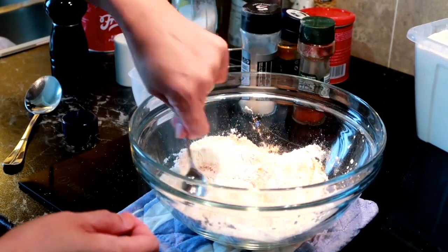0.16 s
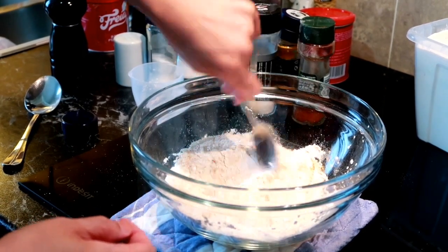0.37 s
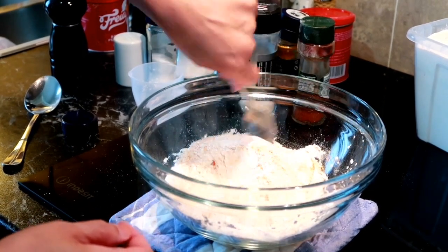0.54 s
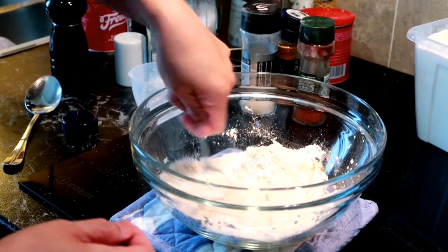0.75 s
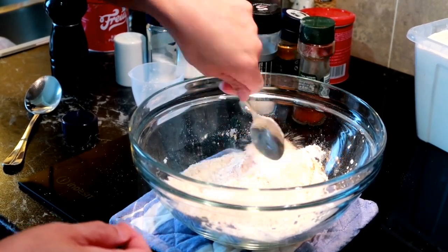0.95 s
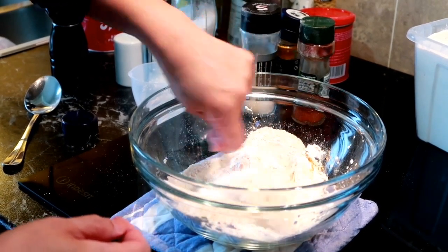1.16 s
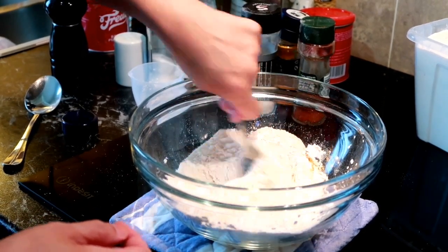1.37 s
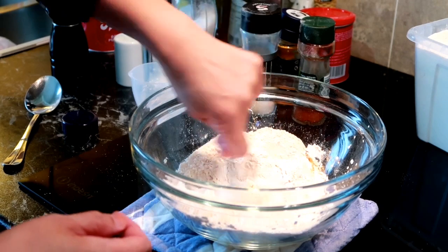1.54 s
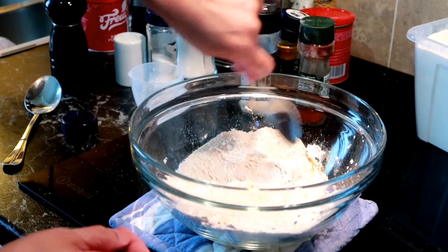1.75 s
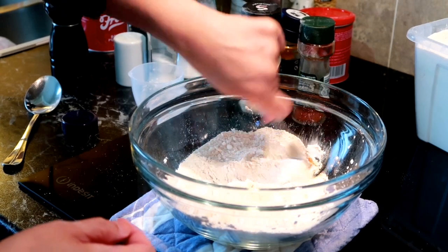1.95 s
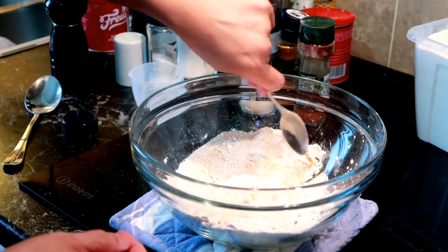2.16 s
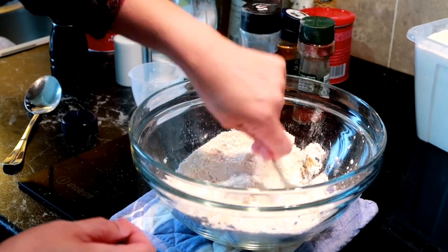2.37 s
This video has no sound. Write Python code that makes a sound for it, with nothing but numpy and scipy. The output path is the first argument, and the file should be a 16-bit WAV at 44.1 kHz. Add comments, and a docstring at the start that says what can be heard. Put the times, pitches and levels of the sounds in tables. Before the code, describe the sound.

Spoon stirring dry flour in a thick glass bowl: bright ringing clinks, dull knocks and short scrapes.

```python
"""Spoon stirring flour in a glass bowl

A steel spoon stirs dry flour in a thick glass bowl on a cloth, heard close up in a small tiled kitchen.
Blows on the wall sum bowl and spoon partials with bursts of noise; the bowl's ring dies at a changing speed.
Under the flour the spoon knocks in short tones and scrapes as random grit driving damped resonances.
The bowl sways and knocks on its cloth; the kitchen answers with decaying noise tails over a soft, steady hum."""
import sys
import numpy as np
from scipy import signal
from scipy.fft import rfft, irfft, next_fast_len
from scipy.io import wavfile
from scipy.ndimage import uniform_filter1d, map_coordinates

SR = 44100
rng = np.random.default_rng(int(sys.argv[2]) if len(sys.argv) > 2 else 0)


def natural_amplitude(level_db):
    """Convert a level in decibels to a linear amplitude factor, elementwise."""
    exponent = np.asarray(level_db, float) / 20
    return 10 ** exponent


def persist_wave(psi):
    """Save psi, clipped to +-1, as 16-bit WAV."""
    counts = np.round(np.clip(psi, -1, 1) * 32767).astype(np.int16)
    wavfile.write(sys.argv[1], SR, np.atleast_2d(counts).T)


N = 110250  # samples, 2.5 s

# blows of the spoon on the glass: start_s, bowl_ring_db, brightness_db_per_octave, four_wave_mode_db,
# rim_place_rad, spoon_ring_db, crack_db
BLOWS = [(0.2142, -33.5, 2, 4, .06, -30.5, -8.5), (0.2173, -11.5, 2.5, -7, 0.042, -30, -10.5),
         (0.3502, -49.5, -10.5, -6, 0.16, -49, -16), (.6105, -24.5, -4, 5.5, .07, -51.5, -11.5),
         (1.9516, -24, 4.2, 0.7, 0.066, -20.5, -13.5), (2.0694, -57, 7, -5, .2, -56, -18),
         (2.1111, -41, .3, -12, .2, -47.5, -27.5), (2.2817, -44.5, 11, 4, 0.028, -44, -15.5)]
# resonances of the spoon's edge, damped against the glass: pitch_hz, width_hz (before squaring), level_db
EDGE_RESONANCES = [(1878, 137, 0), (2670, 500, -0.5), (2940, 330, 1.5), (3390, 480, -7), (5590, 810, -15),
                   (6150, 470, -13.5), (7040, 320, -14), (8250, 1600, -27.5)]
SWELL_S = 0.0035  # time constant of the ring spreading round the bowl


def unit(x):
    """Scale to rms 1."""
    return x / np.sqrt(np.mean(x ** 2) + 1e-20)


def along(points, hz):
    """Read (Hz, value) points on a logarithmic frequency axis."""
    point_hz, value = np.transpose(points)
    return np.interp(np.log(hz + 1), np.log(point_hz + 1), value)


def curve(rows, outside):
    """Draw (s, value) points as one value per sample, with a resting value beyond the ends."""
    point_s, value = np.transpose(rows)
    return np.interp(np.arange(N) / SR, point_s, value, outside, outside)


def filtered(x, response):
    """Multiply the spectrum of x by a response, real or complex, given as a function of frequency."""
    size = next_fast_len(x.shape[-1] + 8192)
    spectrum = rfft(x, size) * response(np.fft.rfftfreq(size, 1 / SR))
    return irfft(spectrum, size)[..., :x.shape[-1]]


def spread(pair):
    """Turn two signals into the mid and side of a stereo pair, the side shaped by frequency."""
    # side against mid at the microphones: pitch_hz, level_db
    side_width = [(300, -15.5), (1500, -27), (2500, -18.5), (3500, -11.5), (8000, 5.8)]
    side = filtered(pair[1], lambda hz: natural_amplitude(along(side_width, hz)))
    return np.array([pair[0] + side, pair[0] - side])


def mode(hz, db, t60, t, worn):
    """One decaying stereo partial; worn is the time as the damping counts it."""
    # higher partials reach the two microphones further out of phase
    spread_rad = min((hz / 3900) ** 4, 2)
    phase = rng.standard_normal() * spread_rad * np.array([[0.5], [-0.5]])
    return natural_amplitude(db - 60 * worn / t60) * np.sin(2 * np.pi * hz * t + phase)


def rings():
    """Bowl ring: where a blow lands on the rim shares its push between the two partials of each row."""
    # bowl modes, most in close pairs that beat; the last row joins two separate high partials:
    # waves_round_rim, first_pitch_hz, second_pitch_hz, level_db, first_t60_s, second_t60_s (at decay speed 1)
    bowl_modes = [(3, 1232, 1234.5, 0, 0.69, 1.52), (4, 2259, 2244, -7, 0.6, 0.54),
                  (5, 3478, 3451, -4, .24, .45), (6, 4883, 6800, -30.5, 0.46, 0.59)]
    # how fast the ring dies: time_s, decay_speed (1 = the listed t60; below 1 rings longer)
    decay_speed = [(0, 1.1), (.22, 1.16), (.35, 0.74), (.45, 1.03), (.6, 1.9), (.63, 0.51), (.7, 0.59),
                   (.77, 1.67), (.84, 1.16), (1.0, 1.3), (1.94, 2.6), (1.97, 0.53), (2.03, 0.73),
                   (2.1, 1.6), (2.26, 1.34), (2.3, 1.99), (2.4, 0.27), (2.5, .8)]
    lowest_hz, four_waves = bowl_modes[0][1], bowl_modes[1][0]
    out = np.zeros((2, N))
    wear = np.cumsum(np.clip(curve(decay_speed, 1), 0.05, 9)) / SR
    for start_s, ring_db, tilt_db, four_db, place, *_ in BLOWS:
        i = round(start_s * SR)
        t = np.arange(min(N - i, SR)) / SR
        worn = wear[i:i + SR] - wear[i]
        swell = 1 - np.exp(-t / SWELL_S)
        for waves, first_hz, second_hz, db, first_t60, second_t60 in bowl_modes:
            level = ring_db + db + four_db * (waves == four_waves) + tilt_db * np.log2(first_hz / lowest_hz)
            first = np.cos(waves * place) * mode(first_hz, level, first_t60, t, worn)
            second = np.sin(waves * place) * mode(second_hz, level, second_t60, t, worn)
            out[:, i:i + SR] += (first + second) * swell
    return out


def spoon():
    """Gripped spoon: short partials that flutter in level, with a splash of bright noise at the start."""
    # spoon partials: pitch_hz, level_db, t60_s
    spoon_modes = [(5249, -10, .14), (5843, -14, .15), (5922, -6, .08), (6029, -6, .1), (6207, -14, .25),
                   (6417, -12, .2), (7162, -9, .26), (7512, -10, .2), (7900, -10, .2), (8130, -8, .15),
                   (8565, -3, .12), (9222, -15, .14), (9570, -9, .22), (9950, -14, .12), (12420, -19, .2)]
    # colour of the splash: pitch_hz, relative level_db_per_hz
    splash_colour = [(1500, -56), (3000, 11), (5500, -0.5), (8300, 3.5), (10200, -22), (11000, -28),
                     (13000, -15), (16000, -33)]
    rattle_per_s, splash_db, splash_t60_s = 76.6, 4, 0.042
    out, t = np.zeros((2, N + SR)), np.arange(SR // 2) / SR
    splash_fade = natural_amplitude(splash_db - 60 * t / splash_t60_s)
    for start_s, *_, spoon_db, _ in BLOWS:
        ring = np.zeros((2, len(t)))
        for hz, db, t60 in spoon_modes:
            # smooth random gain, also turning the partial's sign
            flutter = map_coordinates(rng.standard_normal(SR // 2), [t * rattle_per_s])
            ring += flutter * mode(hz, db, t60, t, t)
        noise = rng.standard_normal((2, len(t)))
        splash = spread(unit(filtered(noise, lambda hz: natural_amplitude(along(splash_colour, hz)))))
        out[:, round(start_s * SR):][:, :len(t)] += natural_amplitude(spoon_db) * (ring + splash_fade * splash)
    return out[:, :N]


def cracks():
    """Steel meeting glass: a few milliseconds of coloured noise at each blow."""
    # colour of the contact: pitch_hz, relative level_db_per_hz
    crack_colour = [(60, -40), (200, -11.5), (650, -4.5), (1100, -10), (1800, -1), (3300, -1),
                    (4400, -11.5), (5000, -16), (6000, -13.5), (8000, -34), (11000, -74), (16000, -70)]
    t60_s, attack_s = 0.016, 0.00068
    out, t = np.zeros((2, N)), np.arange(SR // 20) / SR
    for start_s, *_, db in BLOWS:
        burst = natural_amplitude(db - 60 * t / t60_s) * (1 - np.exp(-t / attack_s))
        out[:, round(start_s * SR):][:, :len(t)] += burst * rng.standard_normal((2, len(t)))

    def even_colour(hz):
        """Scale the colour to rms 1 over frequency, so that it keeps the level of the bursts."""
        gain = natural_amplitude(along(crack_colour, hz))
        return gain / np.sqrt(np.mean(gain ** 2))

    return spread(filtered(out, even_colour))


def resonance(f, hz, width, db):
    """A steep resonance with dark skirts: a bandpass response squared."""
    return natural_amplitude(db) * (1j * f * width / (hz * hz - f * f + 1j * f * width)) ** 2


def edge(f):
    """The spoon's edge pressed on the glass: all its resonances, with alternating sign."""
    return sum((-1) ** k * resonance(f, *row) for k, row in enumerate(EDGE_RESONANCES))


def scrape():
    """Grit slips under the spoon's edge and excites its damped resonances; powder hisses along."""
    # scraping pressure, one list per stretch of scraping: time_s, level_db (before the trim)
    strokes = [
        [(0.64, -53), (0.68, -61.5), (0.712, -48.5), (0.738, -48.5), (0.748, -66), (0.82, -77)],
        [(1.12, -72), (1.176, -53.5), (1.206, -51.5), (1.246, -39.5), (1.264, -63), (1.356, -64), (1.364, -47),
         (1.38, -65), (1.434, -52), (1.468, -57.5), (1.48, -47), (1.546, -61.5), (1.566, -47.5), (1.618, -39),
         (1.626, -59.5), (1.74, -72)],
        [(2.08, -45.5), (2.102, -48), (2.114, -39.5), (2.144, -53.5), (2.22, -63)],
        [(2.32, -68), (2.364, -56), (2.384, -54.5), (2.394, -49.5), (2.416, -53.5), (2.436, -66), (2.442, -55),
         (2.5, -63.5)],
    ]
    # colour of the shifting powder: pitch_hz, relative level_db_per_hz
    powder_colour = [(300, -120), (700, -9), (1500, -0.5), (3500, 6.5), (7000, -18), (11000, -44),
                     (15000, -65)]
    grit_per_s, grit_spread_db = 1800, 6
    patchy_db, patches_per_s = 1.5, 30  # each resonance comes and goes as the spoon tilts
    powder_db, trim_db = -10.5, 0.5
    pressure = sum(natural_amplitude(curve(rows, -120)) for rows in strokes)
    pressure = uniform_filter1d(pressure, size=200)
    edge_rms = np.sqrt(np.mean(abs(edge(np.fft.rfftfreq(SR, 1 / SR))) ** 2))
    rub = np.zeros((2, N))
    for row in EDGE_RESONANCES:
        slips = rng.random((2, N)) < grit_per_s / SR
        size_db = grit_spread_db * np.minimum(rng.exponential(size=(2, N)), 3)
        grit = unit(slips * rng.standard_normal((2, N)) * natural_amplitude(size_db))
        patch = map_coordinates(rng.standard_normal(N), [np.arange(N) * patches_per_s / SR])
        push = grit * pressure * natural_amplitude(patchy_db * patch)
        rub += filtered(push, lambda f: resonance(f, *row)) / edge_rms
    noise = rng.standard_normal((2, N))
    powder = unit(filtered(noise, lambda hz: natural_amplitude(along(powder_colour, hz))))
    return natural_amplitude(trim_db) * spread(rub + natural_amplitude(powder_db) * pressure * powder)


def ticks():
    """Dull knocks and grit snaps under the flour: short damped tones, which also jolt the spoon's edge."""
    # knocks and snaps: start_s, level_db (before the trims below), pitch_hz
    knocks = [(1.1028, -27.5, 1400), (1.1497, -24.5, 1574), (1.222, -30.5, 1910), (1.2405, -26, 2000),
              (1.3283, -34.5, 3160), (1.3631, -30.5, 2420), (1.4315, -35, 2900), (1.479, -37, 2980),
              (1.5743, -48, 2640), (1.6086, -32.5, 3130)]
    fade_cycles = 13.4  # cycles of the main tone to fall 60 dB
    tone_db, jolt_db, attack_s = 2.5, 10, 0.00044
    out, jolt, t = np.zeros(N), np.zeros(N), np.arange(SR // 20) / SR
    for start_s, db, hz in knocks:
        i = round(start_s * SR)
        fade = natural_amplitude(db + tone_db - 60 * t * hz / fade_cycles) * (1 - np.exp(-t / attack_s))
        tones = np.sin(2 * np.pi * hz * t)
        tones += 0.38 * np.sin(2 * np.pi * hz * 1.42 * t)
        tones += 0.39 * np.sin(2 * np.pi * hz * 0.5 * t)
        out[i:][:len(t)] += fade * tones
        jolt[i] = natural_amplitude(db + jolt_db)
    return np.tile(out + filtered(jolt, edge), (2, 1))  # the same in both channels


def sway():
    """The whole bowl sways oval in its slowest mode, and its foot knocks dully on the cloth."""
    # pushes, by how squarely the bowl is hit: start_s, sway_db, knock_db
    pushes = [(.2139, -33, -31.5), (.3501, -39, -37), (.6105, -36.5, -43), (1.9515, -35.5, -36.5),
              (2.0692, -72, -41.5), (2.2817, -39, -36)]
    # oval mode, a close pair: pitch_hz, level_db, t60_s
    oval_modes = [(485, 1, 0.39), (475, -17, 0.43)]
    # knock on the cloth: pitch_hz, level_db, t60_s
    cloth_modes = [(342, -9.5, 0.088), (659.6, -3.5, .16), (726, -5.5, 0.14), (856, 7, 0.027)]
    out, t = np.zeros((2, N + SR)), np.arange(SR) / SR
    swell = 1 - np.exp(-t / SWELL_S)
    for start_s, sway_db, knock_db in pushes:
        oval = sum(mode(hz, sway_db + db, t60, t, t) for hz, db, t60 in oval_modes)
        knock = sum(mode(hz, knock_db + db, t60, t, t) for hz, db, t60 in cloth_modes)
        out[:, round(start_s * SR):][:, :SR] += oval * swell + knock
    return out[:, :N]


def kitchen(x):
    """The walls' answer: noise tails in which each frequency dies at its own speed."""
    # reverberation: pitch_hz, t60_s
    tail_times = [(200, 0.34), (1500, 0.44), (4000, 0.27), (10000, 0.26)]
    wall_delay_s = 0.003
    out, step = np.zeros((2, N + 2 * SR)), SR // 2
    for i in range(0, N, step):  # a fresh tail for each half second
        hz, t, z = signal.stft(rng.standard_normal((2, step)), SR, nperseg=256)
        fade = natural_amplitude(-60 * t / along(tail_times, hz)[:, None])
        tail = signal.istft(z * fade, SR, nperseg=256)[1][:, :step]
        wet = signal.fftconvolve(x[None, i:i + step], tail / np.linalg.norm(tail[0]), axes=1)
        out[:, i + round(wall_delay_s * SR):][:, :wet.shape[1]] += wet
    return spread(out[:, :N])


def hum():
    """The kitchen's steady rumble and hiss: coloured noise, less alike left and right as pitch rises."""
    # colour of the hum: pitch_hz, relative level_db_per_hz
    hum_colour = [(12, -19), (30, -8), (85, -4.5), (125, -10), (165, -6), (195, -4.5), (250, -12),
                  (330, -6.5), (500, -11.5), (1000, -17), (2500, -22), (6000, -30.5), (12500, -37.5),
                  (16000, -66)]
    # left-right likeness: pitch_hz, correlation (1 = same, 0 = unrelated)
    likeness = [(60, 1), (130, 0.95), (300, 0.43), (950, 0.089), (3770, 0.016), (15000, -0.39)]
    hum_db = -52  # rms

    def mid_side_gains(hz):
        """Split the power between mid and side to give the wanted correlation."""
        angle = np.arccos(np.clip(along(likeness, hz), -1, 1)) / 2
        return natural_amplitude(along(hum_colour, hz)) * [np.cos(angle), np.sin(angle)]

    mid, side = filtered(rng.standard_normal((2, N)), mid_side_gains)
    return natural_amplitude(hum_db) * unit(np.array([mid + side, mid - side]))


def scene():
    """Bowl, spoon and flour, their echo and the hum."""
    ring = rings() + sway()
    crack = cracks() + spoon()
    rub = scrape() + ticks()
    # the left channel of each group feeds the room
    room_feed = natural_amplitude(-14.5) * ring[0] + natural_amplitude(-8.5) * crack[0] + natural_amplitude(-7) * rub[0]
    return ring + crack + rub + kitchen(room_feed) + hum()


def roll_off(x):
    """The treble ends steeply here."""
    return signal.sosfilt(signal.butter(12, 16440, fs=SR, output="sos"), x)


def record(dry):
    """Hand over the finished mix."""
    return roll_off(dry)


dry = scene()
out = record(dry)
persist_wave(out)
```